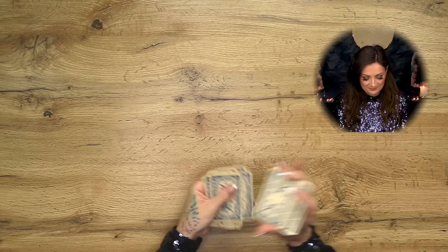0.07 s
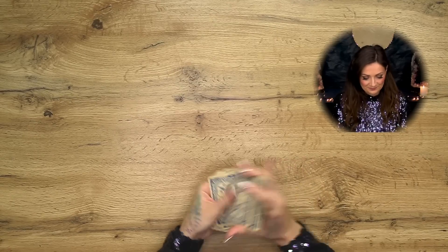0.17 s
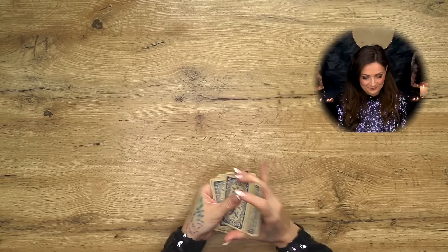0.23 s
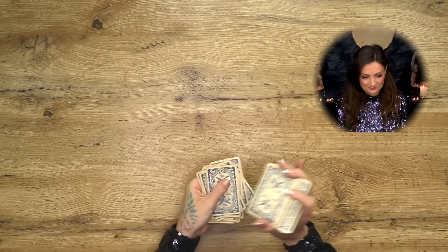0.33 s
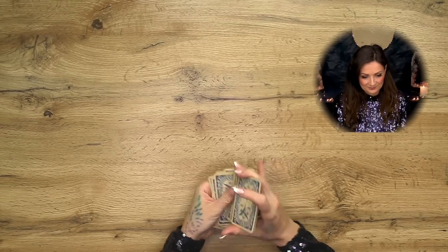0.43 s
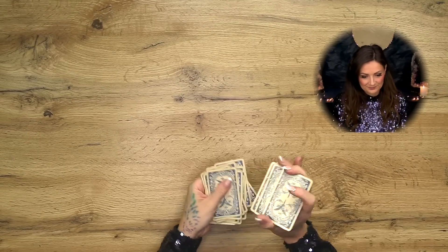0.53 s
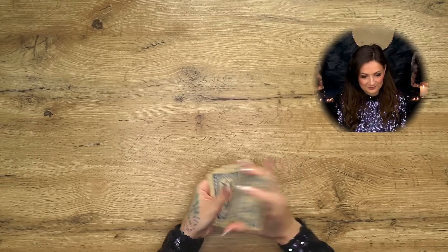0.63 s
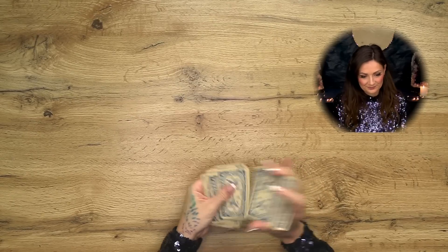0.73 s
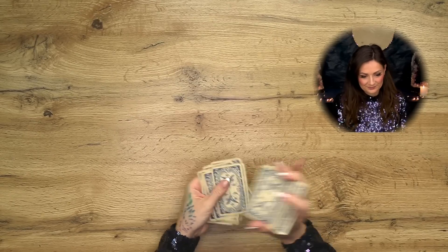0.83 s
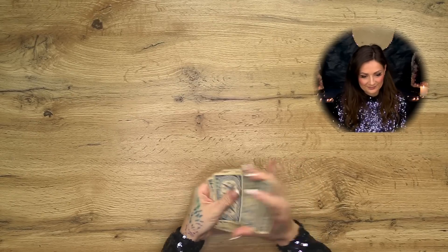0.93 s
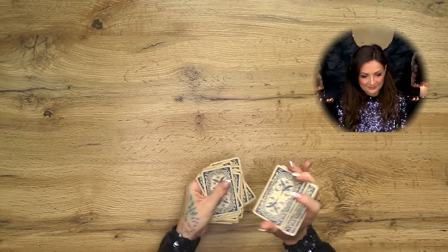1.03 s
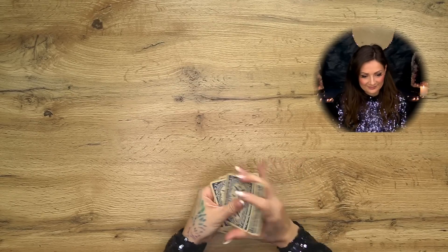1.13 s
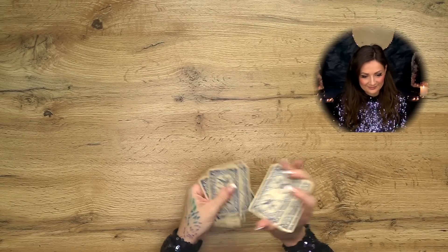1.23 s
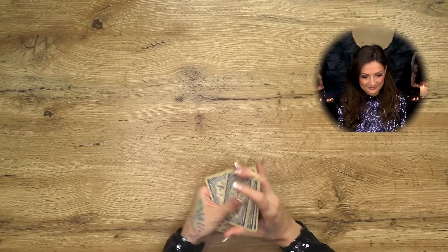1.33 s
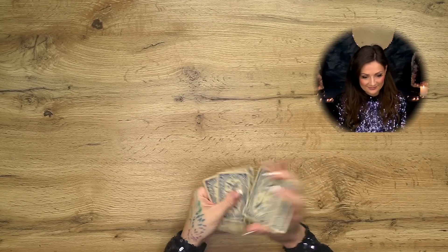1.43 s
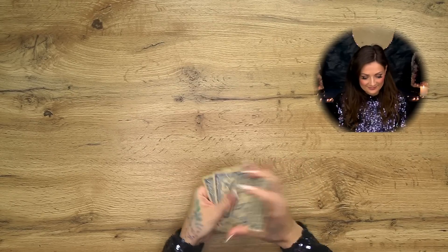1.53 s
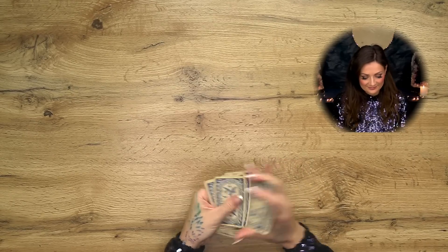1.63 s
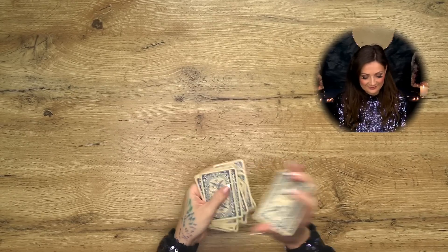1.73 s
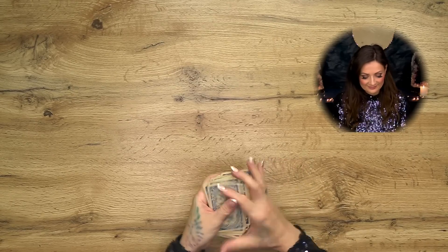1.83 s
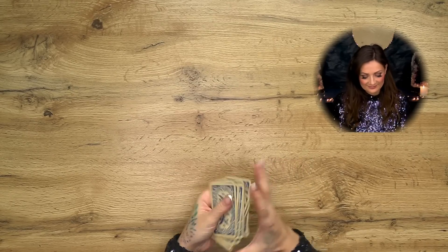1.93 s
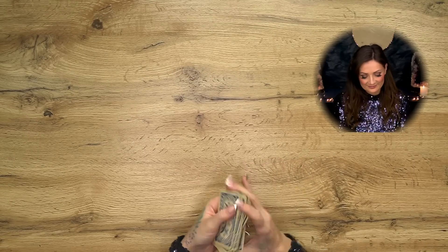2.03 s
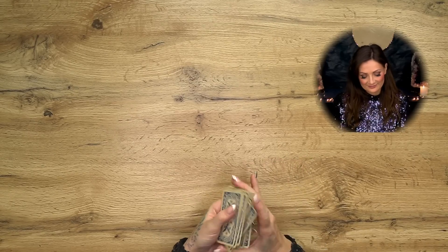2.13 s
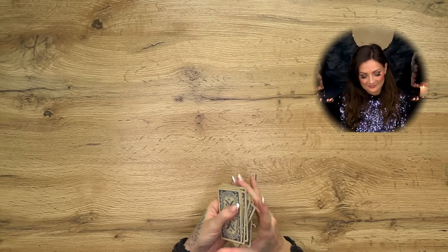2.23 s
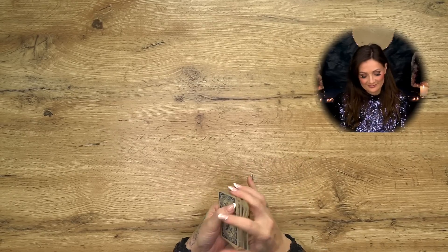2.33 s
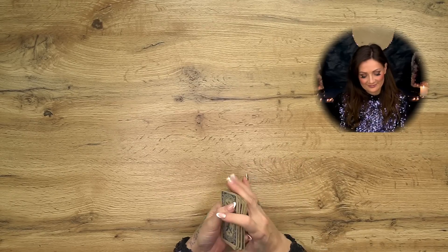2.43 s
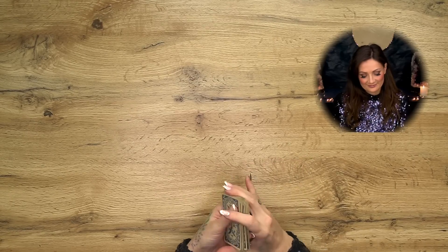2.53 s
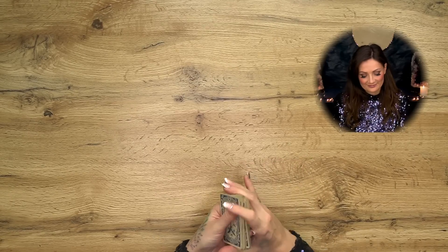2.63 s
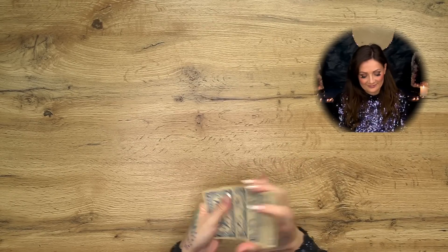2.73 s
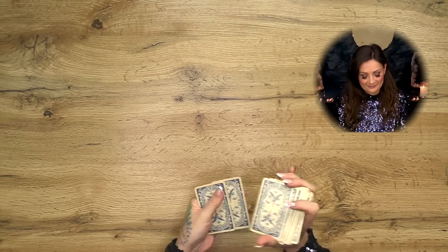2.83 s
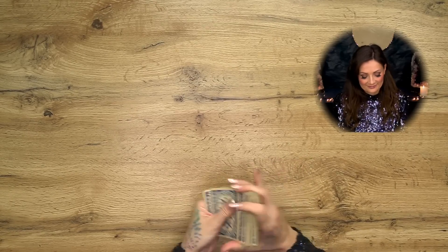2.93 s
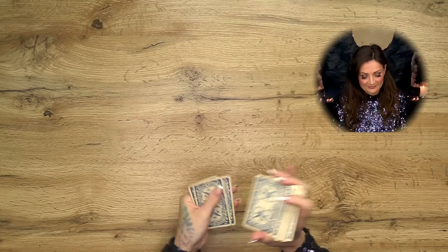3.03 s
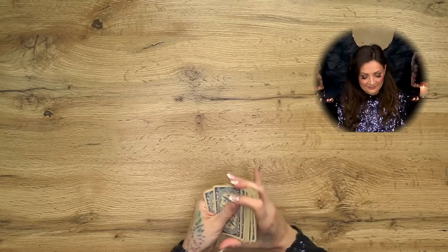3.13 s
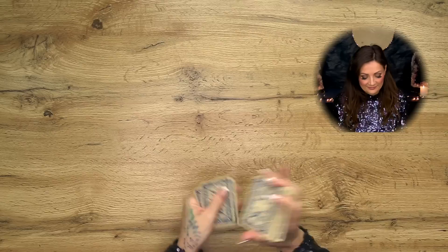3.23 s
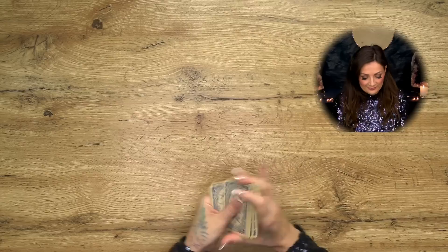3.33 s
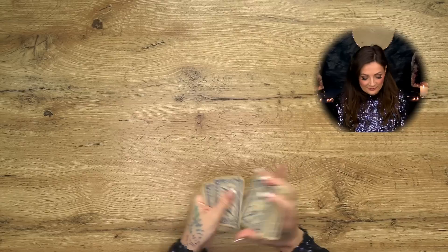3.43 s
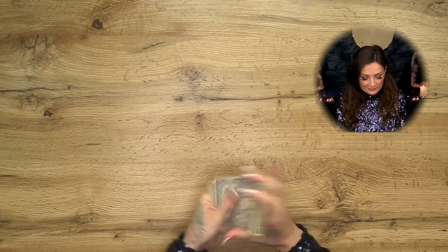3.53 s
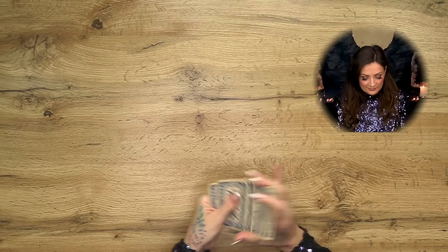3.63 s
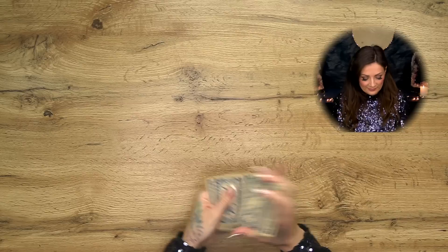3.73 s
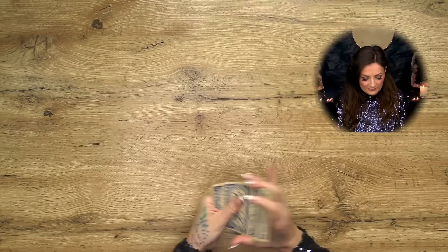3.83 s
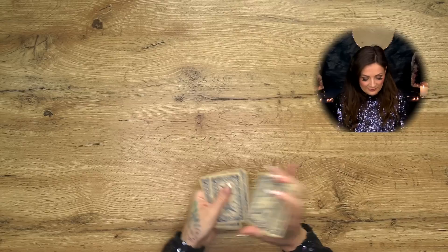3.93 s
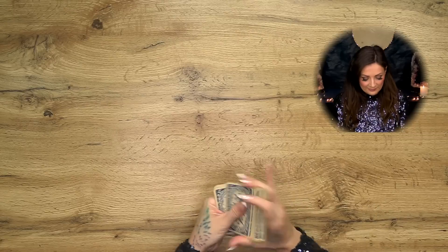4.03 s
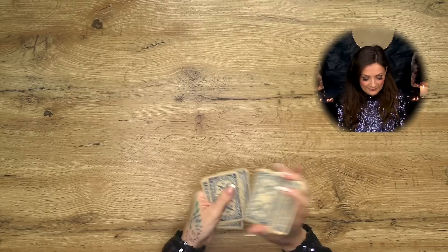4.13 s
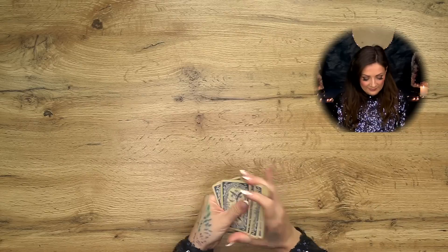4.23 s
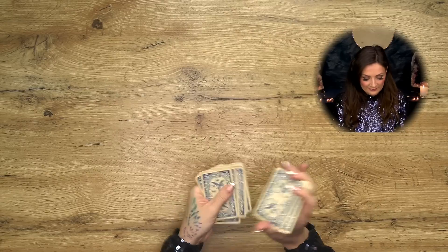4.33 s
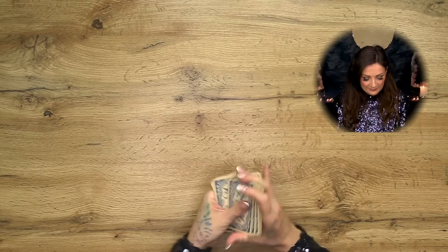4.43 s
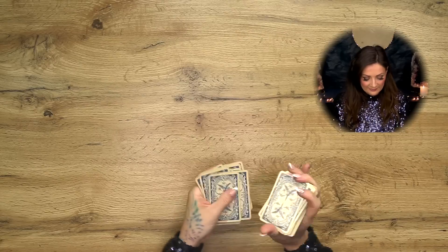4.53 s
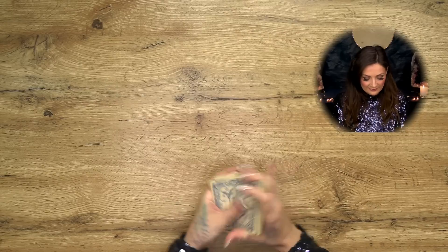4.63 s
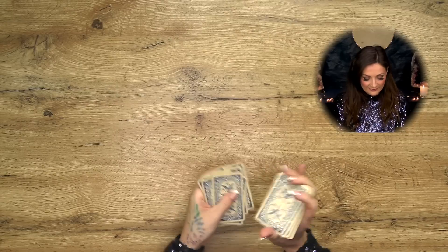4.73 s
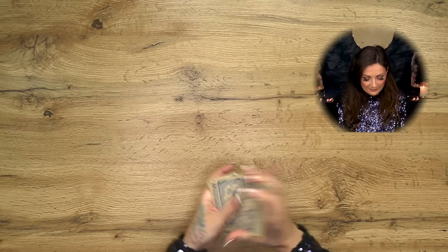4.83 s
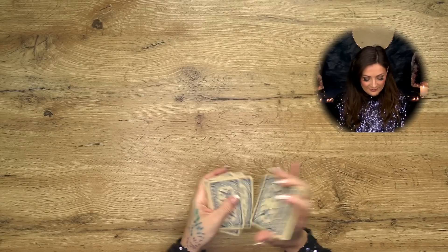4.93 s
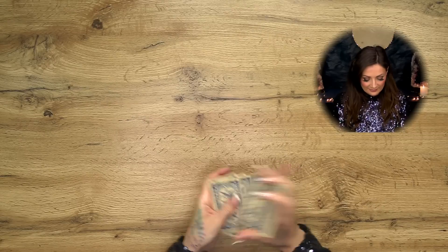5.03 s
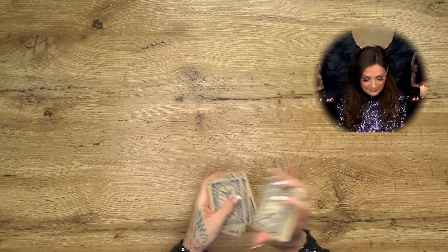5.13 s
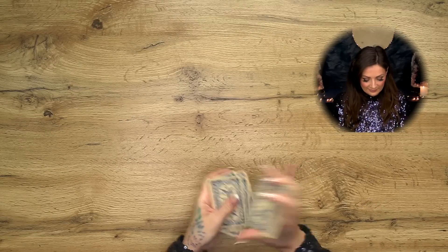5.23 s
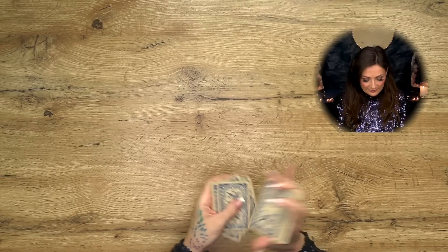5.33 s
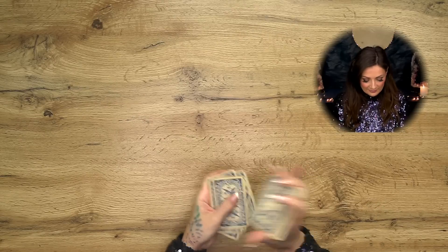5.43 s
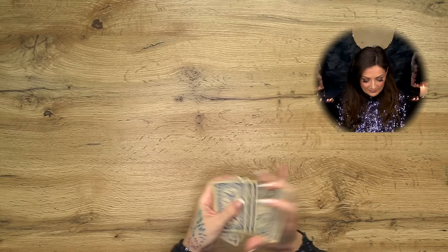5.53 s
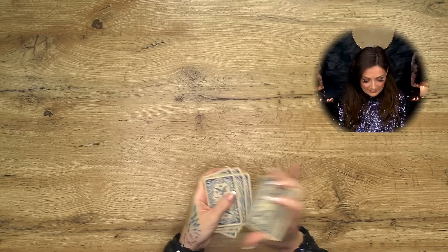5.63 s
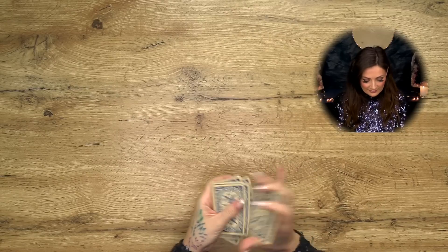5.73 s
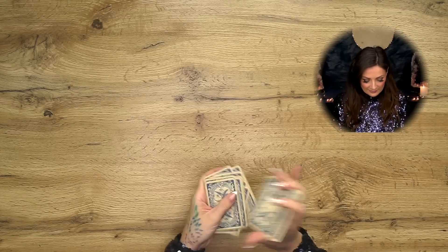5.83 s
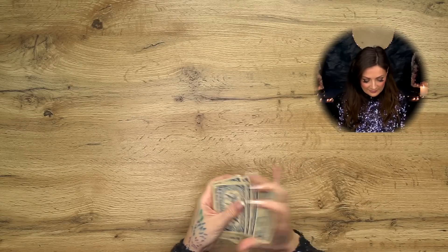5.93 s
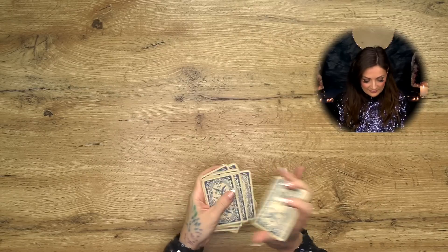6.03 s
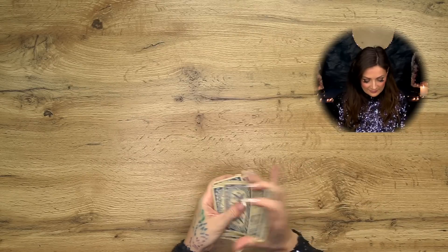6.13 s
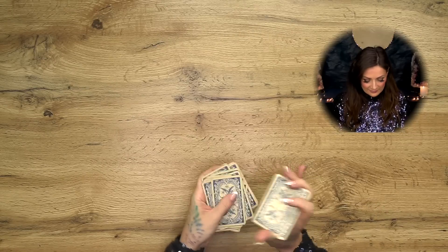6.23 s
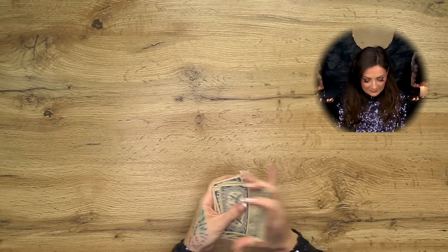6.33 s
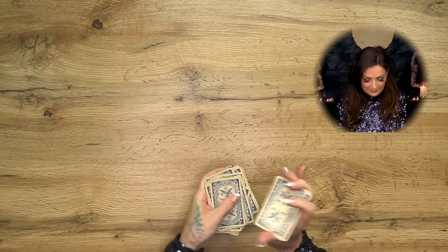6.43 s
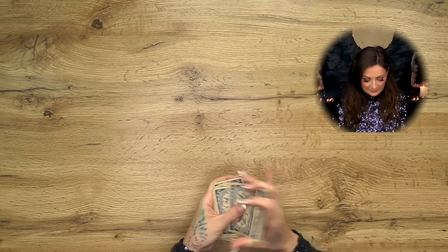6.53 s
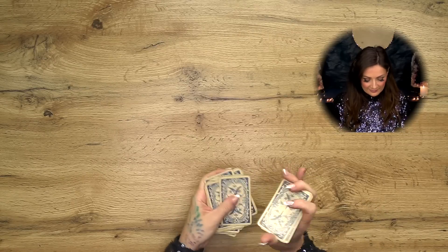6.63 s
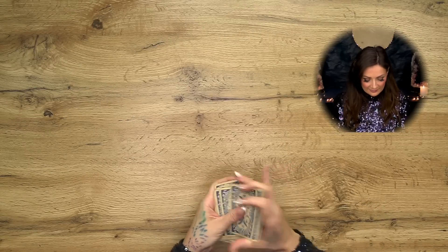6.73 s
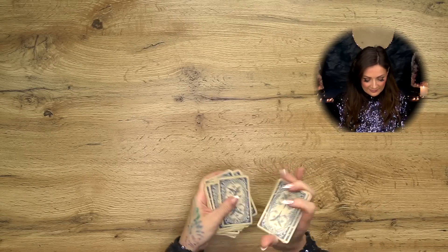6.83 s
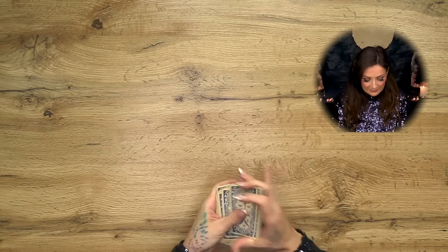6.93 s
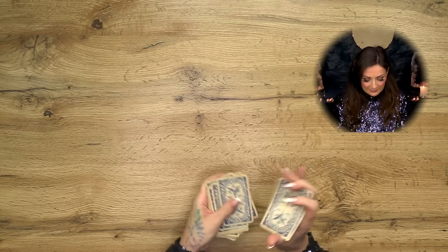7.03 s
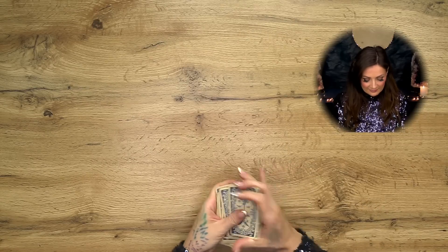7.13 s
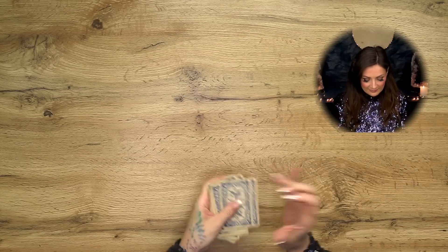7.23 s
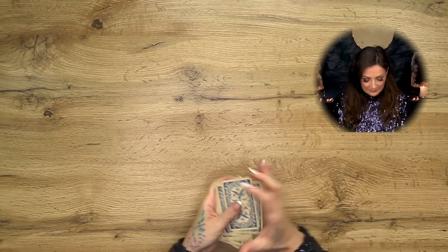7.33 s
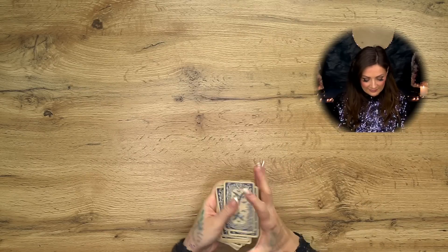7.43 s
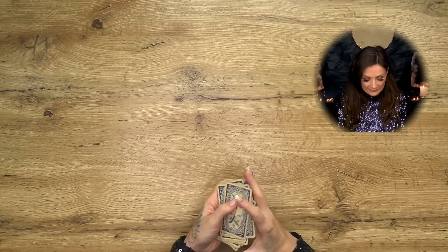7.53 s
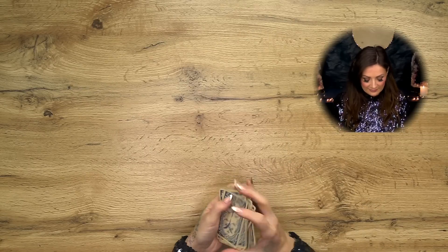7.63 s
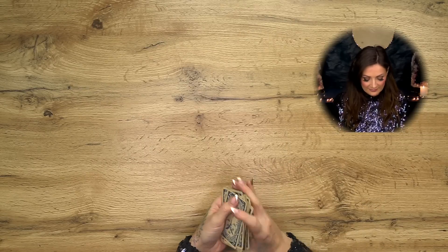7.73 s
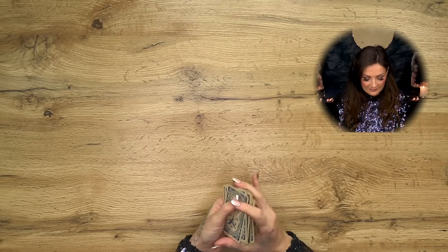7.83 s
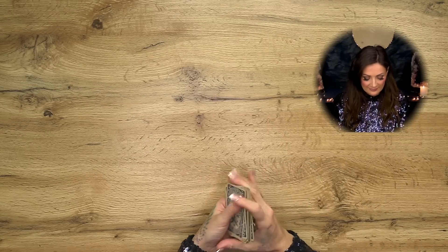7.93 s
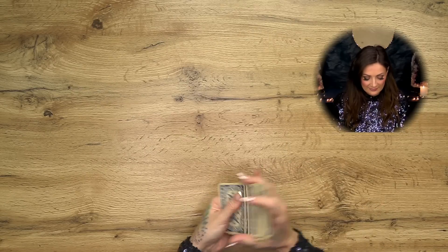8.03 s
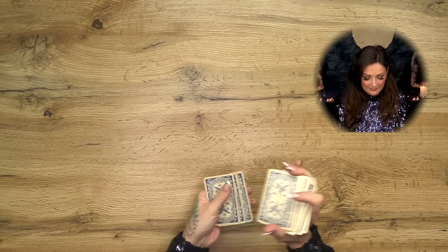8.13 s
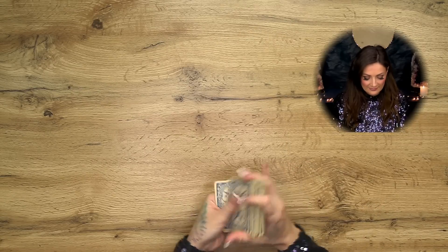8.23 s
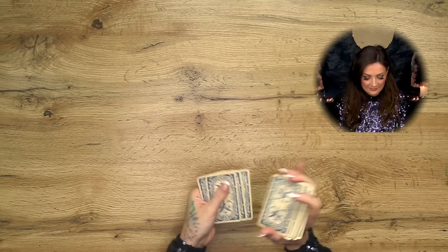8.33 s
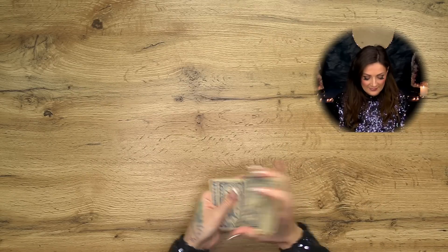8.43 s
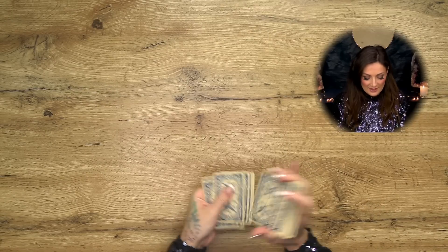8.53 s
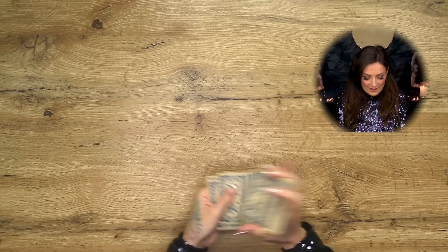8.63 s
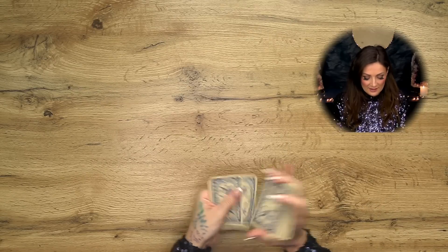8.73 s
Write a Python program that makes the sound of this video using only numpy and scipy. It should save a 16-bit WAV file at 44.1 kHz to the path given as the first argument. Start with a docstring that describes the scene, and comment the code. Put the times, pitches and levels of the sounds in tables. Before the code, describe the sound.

Close to the microphone, packets of stiff cards drop onto a pile with sharp double-edged slaps, about four or five a second, with lighter taps, papery scrapes and tiny corner ticks between. A short burst, a pause, a long steady run, another pause with faint squaring rubs, then two last slaps. A small quiet room gives close echoes and a short tail over very faint hum and hiss.

```python
"""Packets of stiff cards, shuffled overhand above a wooden table, slap onto the pile edge after edge.
Each slap is a burst of filtered noise knocks that rings the deck and the air trapped under the edge.
Between slaps, faces slide with a patchy noise hiss full of tiny corner ticks.
A small, quiet room answers with close echoes and a short tail, over faint noise-band hum and hiss."""
import sys
import numpy as np
from scipy import signal
from scipy.fft import rfft, irfft
from scipy.io import wavfile
from scipy.ndimage import uniform_filter1d

SR = 44100
rng = np.random.default_rng(int(sys.argv[2]) if len(sys.argv) > 2 else 0)


def waveform_to_disk(signal):
    """Save audio, clipped to [-1, 1], as 16-bit WAV at the path in sys.argv[1]."""
    frames = np.transpose(np.atleast_2d(signal))
    scaled = np.clip(frames, -1, 1) * 32767
    samples = np.round(scaled).astype(np.int16)
    wavfile.write(sys.argv[1], SR, samples)


N = 386757

# Slap spectrum below the thud: (frequency [Hz], level before the thud share [dB])
BASS_POINTS = [(30, -11.5), (70, -4.5), (150, -3.5), (300, -3.5)]
# Slap spectrum above the crackle: (frequency [Hz], level over crackle [dB])
TOP_POINT = (16500, -8)
THUD_HZ, SNAP_HZ, CRACKLE_HZ = 730, 3800, 8190
BASS_SHARE = 0.66  # dB of bass per dB of thud
CRACK_MS, CLOSING = 0.16, 0.76  # an edge cracks first, then closes along its length
THIN, FULL = 0.38, 0.94  # filter coefficients: crack leans to treble, closing to low frequencies
RATTLE_MS, RATTLE_DB = 2.83, -15  # decay constant, level before the random contacts
FOCUS = 0.14  # dull blows ring the trapped air more: dB gained per dB of crackle lost
AIR_IN_ROOM = 0.92  # share of the trapped air's dB peak that reaches the walls


def slaps(air_db=8, air_q=4.96):
    """Edges close in small knocks, ringing deck and trapped air; returns close sound and smoother room feed."""
    landings = edges()
    size = 4096
    close, around = np.zeros((2, N + size))
    hz = np.fft.rfftfreq(size, 1 / SR)
    knocks = edge_knocks(landings)

    # each row sets the broad colour, so the close knocks keep only their fine ripple
    power = abs(rfft(knocks, size)) ** 2
    broad_db = 10 * np.log10(uniform_filter1d(power, size=128, axis=1))
    fine_db = 10 * np.log10(uniform_filter1d(power, size=20, axis=1))

    for landing, knock, broad, fine in zip(landings, knocks, broad_db, fine_db):
        time_s, snap_db, thud_db, crackle_db, air_hz = landing
        shape = [(f, db + BASS_SHARE * thud_db) for f, db in BASS_POINTS]
        shape += [(THUD_HZ, thud_db), (SNAP_HZ, 0), (CRACKLE_HZ, crackle_db)]
        shape += [(TOP_POINT[0], TOP_POINT[1] + crackle_db)]
        colour_db = snap_db + read(shape, hz) + deck_db(hz)
        air_peak_db = air_db + np.clip(-FOCUS * crackle_db, 0, 7)
        air = air_peak_db * bump(hz, air_hz, air_hz / air_q)
        start = round(time_s * SR)
        close[start:][:size] += coloured(knock, colour_db + air - broad)
        around[start:][:size] += coloured(knock, colour_db + AIR_IN_ROOM * air - fine)
    return close[:N], around[:N]


def edge_knocks(landings):
    """Random contacts along an edge: a crack, its closing, then the rattle of loose cards settling."""
    ms = np.arange(300) * 1000 / SR
    snap_db = np.array(landings)[:, 1:2]
    spread_ms = np.interp(snap_db, [-10, 3, 9], [1.1, .65, .55])  # light blows close slowly
    contacts = rng.standard_normal((len(landings), 2, 300))
    settling = np.minimum(abs(contacts[:, 1]), 2) ** 2
    rattle = gain_of(RATTLE_DB) * np.exp(-ms / RATTLE_MS) * settling
    crack_envelope = ms / CRACK_MS * np.exp(1 - ms / CRACK_MS)
    crack = signal.lfilter([1, -THIN], [1], contacts[:, 0] * crack_envelope)
    closing_envelope = CLOSING * np.sqrt(ms) * np.exp(-ms / spread_ms) + rattle
    closing = signal.lfilter([1], [1, -FULL], contacts[:, 0] * closing_envelope)
    return crack + closing


# Packets landing on two edges: (first edge time [s], second edge delay [ms], first snap [dB],
# second snap [dB], thud over snap [dB], crackle over snap [dB], trapped air pitch [Hz],
# scrape before landing [dB])
PACKET_DROPS = [(0.1271, 6.6, 3.5, 3.5, -0.5, -3, 1780, -44.5),
                (0.354, 3.9, -2.5, 2.5, -2.5, 6.5, 4200, -42.5),
                (0.8261, 4.7, -0.5, 2.5, -2, -1.5, 1170, -45),
                (1.037, 2.2, -10, 6.5, -2.5, -2, 3960, -38.5), (1.2857, 3.9, 6, 8.5, -6, -5, 1180, -79),
                (1.4982, 2.58, 1.5, 3.5, 0, 2.5, 3700, -42), (1.7157, 3.5, 3.5, 10, -6.5, -6.5, 4630, -38),
                (2.851, 4.06, -12.5, 5.5, 4, -11, 1140, -53), (3.0629, 2.6, -2, 4.5, -2, -2.5, 2670, -37.5),
                (3.2833, 2.7, -4, 8, 0.5, 1.5, 6540, -41), (3.5051, 2.86, 2.5, 4, -5.5, 2, 3820, -39.5),
                (3.737, 3.6, 0, 9, 2.5, -3, 1220, -44), (3.9305, 4.46, 1, 4, -4, 0, 4500, -37.5),
                (4.168, 4.44, 1, 0.5, 3, -2, 4540, -44), (4.3602, 2.93, 2, 8, -3.5, -2, 670, -56),
                (4.5799, 3.8, 2, 9.5, -3.5, -1.5, 1150, -44), (4.7883, 2.23, 0.5, 4, -2, 5.5, 3200, -43.5),
                (5.023, 2.76, -2.5, 2, 6, 5, 4900, -44), (5.2006, 1.56, -8.5, 6.5, 1, 5.5, 8200, -40),
                (5.414, 3.1, -3, 3.5, -2, 3, 4420, -43), (5.6444, 4, -4.5, 5, -2, -3.5, 4450, -44),
                (5.8351, 2.48, 1.5, 9.5, -2, 5.5, 3970, -63), (6.0507, 4.7, 0, 2.5, 1, 0, 2400, -46),
                (6.2474, 3.24, 1, 5.5, -4.5, -2, 1920, -36.5), (6.4453, 2.64, 2.5, 4, -2, 1.5, 1050, -42.5),
                (6.6545, 3.5, 2, 5, -3, 4, 1000, -38.5), (6.863, 3.9, -3, -2.5, 4, 5.5, 1190, -41.5),
                (7.064, 2.97, -0.5, 3, 2.5, -9, 1250, -40.5), (7.261, 4.4, -7, -5.5, -3.5, 0.5, 1200, -47),
                (8.3903, 3.85, -7.5, 4.5, 2.5, 2, 685, -48.5), (8.6231, 3.87, -1, 3, 3, -5, 600, -53)]
# Light touches, each setting off a scrape: (time [s], snap [dB], thud over snap [dB],
# crackle over snap [dB], trapped air pitch [Hz], scrape [dB])
DECK_TAPS = [(0.244, -9.5, 2.5, -6, 1840, -38.5), (0.2574, -8.5, -5, -12, 3920, -80),
             (0.4696, -15.5, 9.5, -8, 1880, -41.5), (0.544, -12.5, -6.5, -6.5, 915, -58),
             (0.7062, -8.5, -8.5, -15.5, 1770, -45), (0.7311, -22, 8.5, 1, 856, -56),
             (0.939, -26, 8, -7, 1750, -49.5), (1.1632, -6, -4.5, -7, 697, -45.5),
             (1.216, -14.5, -4, -60, 1950, -68), (1.3897, 0, -3, -17.5, 1070, -43.5),
             (1.611, -23.5, 4, 7, 1800, -46.5), (1.7056, -20.5, 16, -36, 1920, -73),
             (1.877, -2, -5.5, -27, 2000, -41.5), (1.936, -15, 4.5, -8, 3600, -81),
             (2.2188, -44, 18.5, 14, 730, -63), (2.9551, -6.5, 6.5, -30, 754, -39),
             (3.1808, -17, 17.5, -29, 1006, -36.5), (3.205, 3.5, -2.5, -27, 1650, -43),
             (3.213, -9, -5, -13, 1760, -59), (3.402, -14, 4.5, 6.5, 706, -40),
             (3.438, -6, -3.5, -12, 1050, -68), (3.617, -3.5, -2.5, -5, 1000, -40.5),
             (3.8361, -1.5, -8, -9.5, 840, -53), (4.041, -4, 0.5, -5.5, 1670, -38),
             (4.134, -12, -2, -15, 3100, -56), (4.238, -9.5, -5, -6, 2440, -40),
             (4.2543, -3, -5.5, -19, 2030, -51), (4.4609, -3, -0.5, -9.5, 934, -37),
             (4.6784, -4.5, 6, -0.5, 1840, -35.5), (4.8968, -8.5, 1, -9, 1000, -38.5),
             (5.1054, -9, -28, -4, 2740, -40), (5.3145, -6.5, 4.5, -0.5, 8040, -41),
             (5.5206, -6, -3, -6, 2020, -44.5), (5.715, -4.5, -4, -4.5, 2750, -36),
             (5.8127, -16, -14, -16, 3740, -47), (5.9327, -6, -8, -0.5, 4730, -42.5),
             (6.14, -7.5, 3, -2.5, 2860, -42), (6.1505, -6.5, -12, -3, 7530, -71),
             (6.351, -7.5, -4, -11.5, 1820, -43.5), (6.4284, -11.5, -2, -6, 960, -55),
             (6.556, -6, -7, -7.5, 685, -48.5), (6.6437, -9, 1, -4, 6120, -49),
             (6.7655, -10, -3.5, -15, 1950, -45.5), (6.9663, -16.5, 6.5, -8, 2070, -59),
             (6.984, -11, -10, -8.5, 696, -54), (7.0553, -8.5, 0, 2.5, 1040, -48),
             (7.229, -7.5, -13, -24, 1730, -50), (7.2492, -22.5, 21, 8.5, 10100, -55),
             (7.433, -17, 5.5, -2, 1040, -59), (7.452, -22.5, 5, -6, 3660, -62),
             (7.498, -32.5, 10, 14, 9000, -89), (7.772, -28, 4, -14.5, 1830, -71),
             (8.04, -24.5, -13, -16, 2130, -74), (8.1576, -9, 7, -5, 1790, -73),
             (8.2725, -6.5, 2.5, -10.5, 2960, -44.5), (8.505, -21, 10, -5, 8100, -45),
             (8.717, -10, 1, -8, 2520, -44)]
# Single corners catching: (time [s], snap [dB], trapped air pitch [Hz])
CORNER_TICKS = [(0.296, -20, 1780), (0.347, -11, 2500), (0.523, -24, 1730), (0.815, -25, 4690),
                (1.265, -20, 860), (1.406, -21, 3000), (1.674, -20.5, 1740), (1.894, -23, 2150),
                (2.839, -24, 1950), (2.979, -11.5, 1090), (3.048, -11, 3360), (3.196, -11, 2900),
                (3.262, -19, 1095), (3.275, -13, 2915), (3.411, -10, 3360), (3.827, -13, 1670),
                (3.907, -18, 3080), (4.059, -14, 1580), (4.348, -19.5, 2630), (4.48, -13, 1860),
                (4.5, -23, 900), (4.544, -23, 1000), (4.549, -19.5, 2800), (4.57, -15, 1500),
                (4.696, -10, 5500), (4.991, -23, 886), (5.113, -14.5, 2780), (5.184, -20, 3230),
                (5.325, -11.5, 7800), (5.552, -18, 2200), (5.73, -16.5, 3000), (5.7358, -14, 4500),
                (5.928, -15, 2020), (6.038, -20, 3490), (6.155, -10.5, 3530), (6.225, -18, 1160),
                (6.854, -8, 1074), (7.176, -18, 573), (8.282, -18.5, 3060), (8.614, -20, 650),
                (8.704, -16, 755)]
TICK_THUD_DB, TICK_CRACKLE_DB = 4.5, -3.5  # over the snap
FIRST_THUD_DB, FIRST_CRACKLE_DB = 3, -5  # offsets: the first edge is duller than the second


def edges():
    """Lists each edge contact: (time [s], snap [dB], thud [dB], crackle [dB], trapped air [Hz])."""
    first, second = [], []
    for s, delay_ms, first_db, second_db, thud_db, crackle_db, air_hz, _ in PACKET_DROPS:
        first.append((s, first_db, thud_db + FIRST_THUD_DB, crackle_db + FIRST_CRACKLE_DB, air_hz))
        second.append((s + delay_ms / 1000, second_db, thud_db, crackle_db, air_hz))
    taps = [row[:-1] for row in DECK_TAPS]
    ticks = [(s, db, TICK_THUD_DB, TICK_CRACKLE_DB, air_hz) for s, db, air_hz in CORNER_TICKS]
    return first + second + taps + ticks


# Resonances of the held cards: (frequency [Hz], width [Hz], peak [dB])
DECK_MODES = [(525, 220, 3), (983, 222, 4.5), (1855, 87, 3), (2660, 280, 1), (3090, 900, 2)]


def deck_db(hz):
    """Sums the resonance peaks that the held cards ring with."""
    return sum(db * bump(hz, f, width) for f, width, db in DECK_MODES)


# Free strokes squaring the deck, swelling and fading: (middle [s], length [s], level [dB])
STROKES = [(0.048, 0.069, -52.5), (2.103, 0.094, -61), (2.794, 0.1, -50), (7.185, 0.027, -46.5),
           (7.228, 0.017, -47), (7.485, 0.032, -50), (1.266, 0.071, -54), (7.599, 0.021, -62.5),
           (7.68, 0.06, -57.5), (7.876, 0.029, -62), (8.116, 0.097, -53.5)]
# Spectrum of rubbing faces: (frequency [Hz], relative density [dB per Hz])
RUB_SPECTRUM = [(100, -38), (200, -4.5), (1100, -9), (2000, -2.5), (9000, -4.5), (15000, -17),
                (16500, -48.5)]
SCRAPE_DB_PER_S, APPROACH_DB_PER_S = 290.5, 314  # fall after a tap, rise towards a drop
SCRAPE_LEAD_S = 0.0018  # faces touch just before the edge knocks
TOUCH_S, LOOSE_DB = 0.0075, -4.5  # a packet presses on the pile only this late; before, it is softer
SCRAPE_AIR_DB, SCRAPE_AIR_Q = 4, 5  # a scrape sings through the gap of the latest touch
FLUTTER_DB = -7  # over the hiss


def slides(patchy_db=2.0, flicker_limit_db=7.0, colour_db=4.0):
    """Faces rub with a patchy hiss of drifting colour; catching corners make it grainy."""
    hop = 64
    hz = np.fft.rfftfreq(256, 1 / SR)[:, None]
    t = np.arange(N // hop + 5) * hop / SR
    patches = rng.standard_normal((len(t), len(hz), 2)).T
    fine = smooth_field(patches[0], bins=5, frames=14)
    broad = smooth_field(patches[1], bins=24, frames=50)
    flicker = np.tanh(0.4 * evened(uniform_filter1d(rng.standard_normal(len(t)), size=4)))

    touch_s, air_hz = np.array(DECK_TAPS)[:, [0, 4]].T
    latest_touch = np.maximum(np.searchsorted(touch_s - SCRAPE_LEAD_S, t) - 1, 0)
    gap_hz = air_hz[latest_touch]
    song_db = SCRAPE_AIR_DB * bump(hz, gap_hz, gap_hz / SCRAPE_AIR_Q)

    field_db = read(RUB_SPECTRUM, hz) + deck_db(hz) + song_db
    field_db = field_db + patchy_db * fine + colour_db * broad + flicker_limit_db * flicker
    hiss = evened(noise(field_db, size=256))
    grainy = evened(hiss + gain_of(FLUTTER_DB) * flutter())
    return grainy * np.interp(np.arange(N) / SR, t, slide_level(t))


def slide_level(t):
    """Adds strokes, scrapes dying after taps and scrapes swelling towards drops."""
    level = np.zeros(len(t))
    for s, length_s, db in STROKES:
        level += gain_of(db) * np.exp(-(2 * (t - s) / length_s) ** 2)
    for s, *_, db in DECK_TAPS:
        level += gain_of(db - SCRAPE_DB_PER_S * abs(t - s)) * (t >= s - SCRAPE_LEAD_S)
    for s, *_, db in PACKET_DROPS:
        loose_db = LOOSE_DB * (t < s - TOUCH_S)
        level += gain_of(db - APPROACH_DB_PER_S * abs(t - s) + loose_db) * (t < s)
    return level


FLUTTER_HZ = (900, 7000)  # pitch range: (lowest [Hz], highest [Hz])
FLUTTER_CYCLES = 2.07  # ring envelope peaks after half this many cycles


def flutter(ticks_per_s=350, spread_db=4.0, count=24):
    """Corners catch and let go: sparse, very short rings at one of several pitches."""
    size_db = spread_db * np.minimum(rng.exponential(1, N), 3)
    size = gain_of(size_db) * (rng.random(N) < ticks_per_s / SR)
    corner = rng.integers(0, count, N)
    t, out = np.arange(400) / SR, np.zeros(N)
    for k, hz in enumerate(np.geomspace(*FLUTTER_HZ, count)):
        fade = t * hz * 2 / FLUTTER_CYCLES
        ring = fade * np.exp(-fade) * np.sin(2 * np.pi * hz * t)
        out += signal.oaconvolve(size * (corner == k), ring)[:N]
    return evened(out)


# Close echoes: (delay [ms], level before dulling [dB])
CLOSE_ECHOES = [(2.9, -30), (5.3, -22), (8.8, -15.5), (11.2, -19), (15, -19.5), (19.5, -24.5)]
# Room tail: (frequency [Hz], decay time T60 [s], relative level [dB])
TAIL_BANDS = [(202, 0.27, -9.5), (794, 0.19, -12.5), (2780, 0.23, -11), (7410, 0.16, -5),
              (11480, 0.18, -17), (16000, .1, -12.5)]
# Waves that linger in the room: (frequency [Hz], peak [dB])
STANDING_WAVES = [(676, 10.5), (782, 12.5), (1085, 3), (1390, 1), (1820, 6)]
TAIL_GAIN_DB = -11.5


def room(close, around, gap_ms=12, dull=0.12, standing_width_hz=35):
    """Single echoes from table and walls, then sparse taps whose bands die at their own speed."""
    near = np.zeros(2048)
    for ms, db in CLOSE_ECHOES:
        near[round(ms * SR / 1000)] = gain_of(db)
    near = signal.lfilter([1 - dull], [1, -dull], near)  # soft surfaces dull the echoes
    tails = room_tails(gap_ms, standing_width_hz)
    # the tail slowly drifts between three random reflection patterns
    phase = 1.295 * np.arange(N) / SR + np.arange(3)[:, None] / 3  # half cycles
    pattern_gains = np.sqrt(2 / 3) * np.cos(np.pi * phase)
    wet = signal.fftconvolve(around * pattern_gains, tails, axes=1)[:, :N].sum(0)
    return signal.oaconvolve(close, near)[:N] + gain_of(TAIL_GAIN_DB) * wet


def room_tails(gap_ms, standing_width_hz):
    """Builds three decaying patterns of random reflections, coloured by standing waves."""
    length, spacing = SR // 2, 20
    taps = np.zeros((3, length))
    starts = np.arange(0, length - spacing, spacing)
    places = starts + rng.integers(0, spacing, (3, len(starts)))
    np.put_along_axis(taps, places, rng.choice([-1., 1.], (3, len(starts))), 1)
    hz, t, spectra = signal.stft(taps, SR, nperseg=256)
    bands = np.array(TAIL_BANDS)
    t60_s = read(bands[:, :2], hz)[:, None]
    wall_db = read(bands[:, ::2], hz)[:, None]
    decayed = spectra * gain_of(wall_db - 60 * t / t60_s)
    tails = signal.istft(decayed, SR, nperseg=256)[1][:, :length]
    tails *= np.clip(np.arange(length) * 1000 / SR / gap_ms, 0, 1) ** 2
    hz = np.fft.rfftfreq(32768, 1 / SR)
    standing_db = sum(db * bump(hz, f, standing_width_hz) for f, db in STANDING_WAVES)
    return coloured(tails, standing_db)


# Hiss spectrum: (frequency [Hz], relative density [dB per Hz])
HISS_SPECTRUM = [(20, -18), (40, -28.5), (120, -13.5), (300, -14.5), (1200, -19.5), (5000, -23.5),
                 (10000, -28), (15000, -30.5), (16500, -43)]
# Hum of a distant machine: (frequency [Hz], width [Hz], level [dB])
MACHINE_HUM = (64, 9, -72.5)
HISS_DB = -67  # before the treble flicker


def floor(flicker_limit_db=4.0, from_hz=2500):
    """Shaped noise hiss with flickering treble, plus a narrow noise band as a wavering low hum."""
    hz, frames = np.fft.rfftfreq(4096, 1 / SR), np.zeros(N // 1024 + 5)
    hiss = evened(noise(read(HISS_SPECTRUM, hz)[:, None] + frames, size=4096))
    treble = signal.lfilter(*signal.butter(2, from_hz, "high", fs=SR), hiss)
    drift = uniform_filter1d(rng.standard_normal(N), size=1200)
    flicker = np.tanh(evened(uniform_filter1d(drift, size=1200)))
    hiss = hiss + treble * (gain_of(flicker_limit_db * flicker) - 1)
    hum_hz, width_hz, hum_db = MACHINE_HUM
    hum_shape_db = 20 * np.log10(bump(hz, hum_hz, width_hz))[:, None]
    hum = evened(noise(hum_shape_db + frames, size=4096))
    return gain_of(HISS_DB) * hiss + gain_of(hum_db) * hum


def gain_of(db):
    """Converts decibels to amplitude."""
    return 10 ** (np.asarray(db) / 20)


def evened(x):
    """Scales to rms 1."""
    return x / np.sqrt(np.mean(x ** 2) + 1e-20)


def smooth_field(x, bins, frames):
    """Smooths noise over frequency and time, at rms 1."""
    return evened(uniform_filter1d(uniform_filter1d(x, size=bins, axis=0), size=frames, axis=1))


def read(points, hz):
    """Interpolates a spectrum on a log-frequency axis."""
    f, value = np.transpose(points)
    return np.interp(np.log(hz + 1), np.log(f + 1), value)


def bump(hz, centre_hz, width_hz):
    """A resonance peak of height 1."""
    return 1 / (1 + (2 * (hz - centre_hz) / width_hz) ** 2)


def coloured(x, db):
    """Filters causally: the phase follows from the log gain."""
    log_gain = np.log(gain_of(np.r_[db, db[-2:0:-1]]))
    response = np.exp(np.conj(signal.hilbert(log_gain)))[:len(db)]
    return irfft(rfft(x, len(log_gain)) * response)


def noise(field_db, size):
    """Random short-time spectra under a dB field of bins by frames."""
    a, b = rng.standard_normal(field_db.shape[::-1] + (2,)).T
    spectra = (a + 1j * b) * gain_of(field_db)
    return signal.istft(spectra, nperseg=size, noverlap=size - size // 4)[1][:N]


def scene():
    """Cards, close and in the room, over the floor."""
    close, around = slaps()
    rub = slides()
    return (close + rub + room(close + rub, around + rub) + floor())[None]


EDGE_HZ = 16200


def record(dry):
    """Limits the band with a linear-phase low-pass."""
    lowpass = signal.firwin(511, EDGE_HZ, window=("kaiser", 9), fs=SR)
    return signal.oaconvolve(dry, lowpass[None], "same")


dry = scene()
out = record(dry)
waveform_to_disk(out)
```